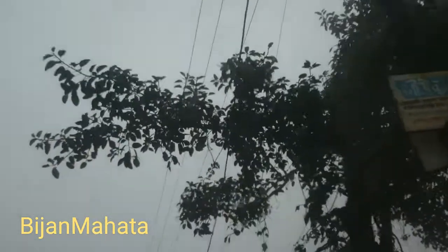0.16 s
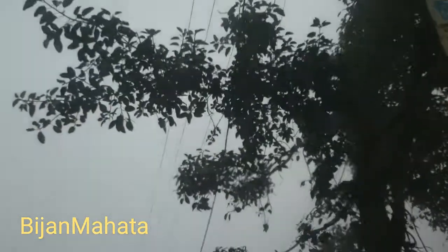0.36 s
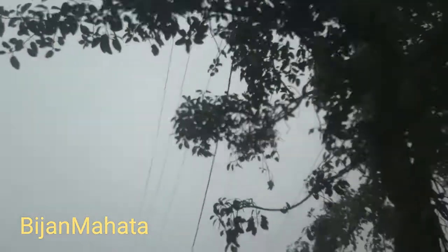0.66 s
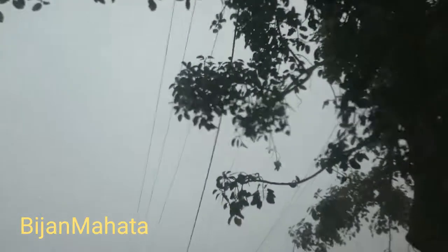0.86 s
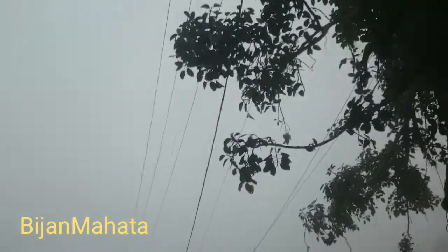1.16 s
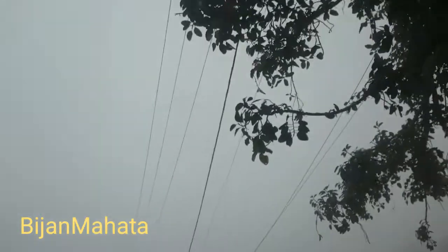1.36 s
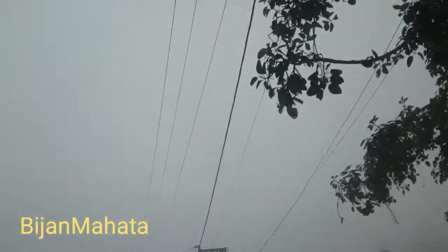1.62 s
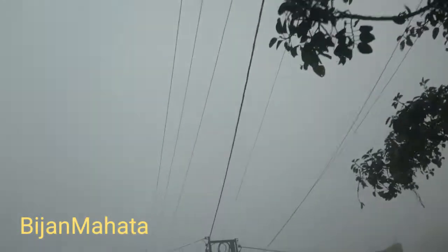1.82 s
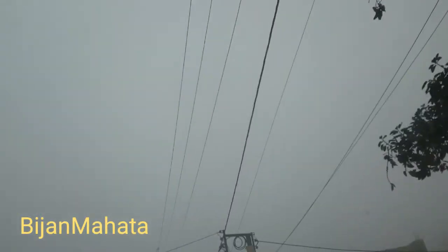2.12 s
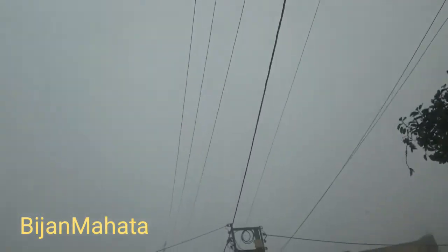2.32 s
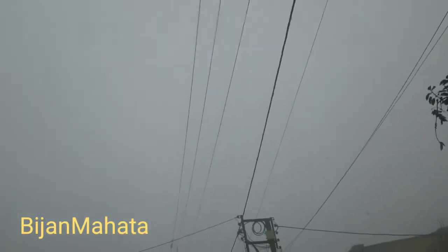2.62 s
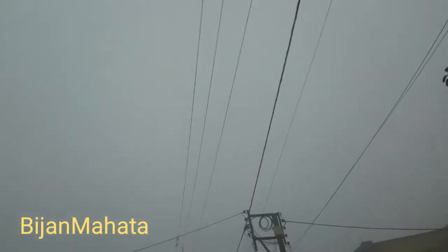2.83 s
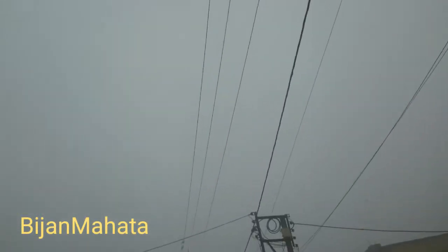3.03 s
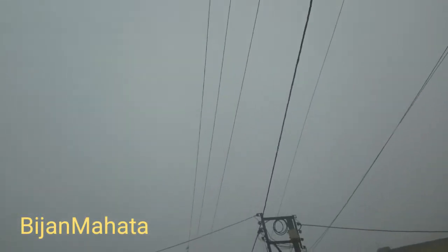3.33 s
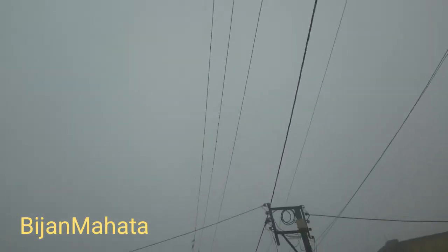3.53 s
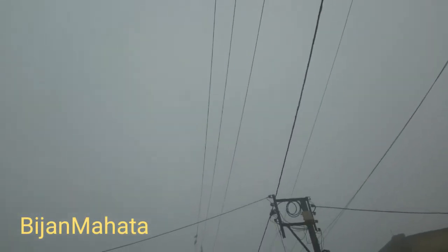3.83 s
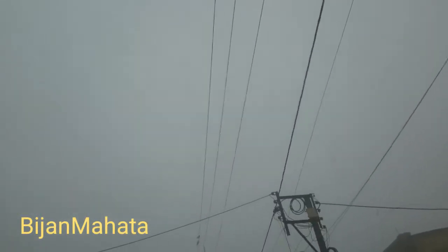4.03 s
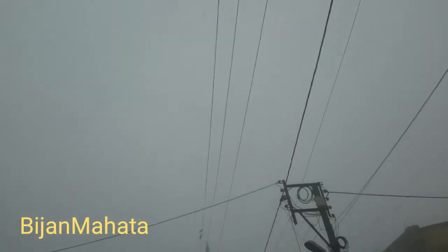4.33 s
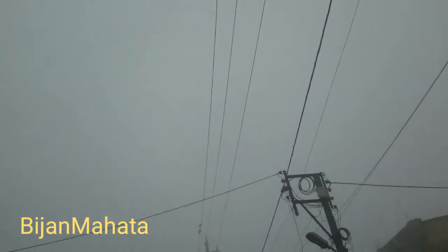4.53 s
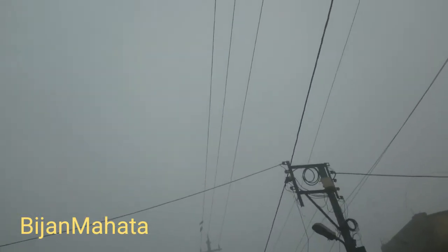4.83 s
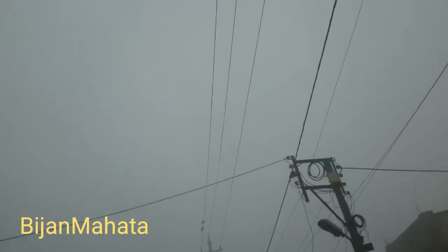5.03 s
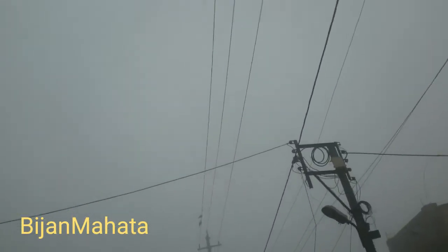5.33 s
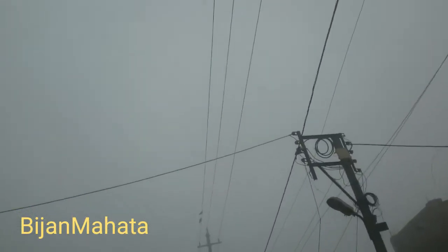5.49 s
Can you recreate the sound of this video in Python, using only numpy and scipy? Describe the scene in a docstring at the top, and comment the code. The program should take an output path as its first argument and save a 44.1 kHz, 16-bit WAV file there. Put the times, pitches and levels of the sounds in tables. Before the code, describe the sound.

Small car cabin, close and dry, recorded by a phone; bass-heavy rumble and engine drone throughout, with soft tyre roar and airy hiss. At 0-0.15 s a trim joint creaks in quick slips over a deep swell. From 0.27 s a relay ticks evenly, about every third of a second, alternating slightly in tone. The drone wavers, with a dry crackle around 0.5-1.3 s. From 0.3 s a loose fitting rasps about twenty times a second, faint at first, stronger from 1.3 to 3.4 s and again 3.5-3.9 s, with small bright stop clicks. A hiss swells at 1.45 s. The engine sinks and fades until 3.3 s; grit patters from 2.5 to about 4.7 s. A plastic clack at 3.15 s, a harder clack and suspension thump at 3.65 s. After 4.3 s it pulls on again; clustered clacks and a low thump at 5.03 s, the drone rising to the end at 5.66 s.

```python
"""The engine drone of a small car sinks as it slows on a rough road, then picks up as it pulls on again.
The drone is a stack of sine waves; the body rumble, tyre roar, air rush and hiss are coloured noise.
A loose fitting rasps about twenty times a second in noise bursts and clicks on its stop.
A relay ticks evenly; the trim clacks, crackles and creaks: short pushes set resonances ringing."""
import sys
import numpy as np
from scipy import signal
from scipy.fft import rfft, irfft, next_fast_len
from scipy.io import wavfile
from scipy.ndimage import uniform_filter1d

SR = 44100
rng = np.random.default_rng(int(sys.argv[2]) if len(sys.argv) > 2 else 0)


def digitize_waveform(pressure):
    """Quantize a signal to 16-bit integers and store it at the path in sys.argv[1].

    Rows of a 2-D input are taken as channels; values are limited to [-1, 1].
    """
    field = np.atleast_2d(pressure).T
    bounded = np.clip(field, -1, 1)
    quanta = np.round(bounded * 32767).astype(np.int16)
    wavfile.write(sys.argv[1], SR, quanta)


N = 249555
TIME = np.arange(N) / SR  # seconds

# Engine speed over time. Each row: time in seconds, firing rate in Hz.
ENGINE_SPEED = [(0.0, 54.59), (0.6, 52.45), (0.95, 52.5), (1.7, 44.38), (2.5, 34.86), (3.3, 25.66),
                (4.3, 27.6), (5.1, 32.34), (5.45, 39.47), (5.66, 40.48)]
# Colour of gritty scraping. Each row: frequency in Hz, relative level in dB per Hz.
SCRAPE_COLOUR = [(4000, -2.5), (6400, 5), (8000, 2.5), (10400, 2.5), (12000, -5.5), (13800, -7),
                 (15000, -17)]
# Colour of the loose fitting's body, also lent to crackles. Each row: frequency in Hz, relative level in dB per Hz.
FITTING_COLOUR = [(700, 1), (1400, 4), (2100, -3.5), (2700, 5.5), (3400, 2.5), (4200, 7), (5100, 5.5),
                  (6000, -10), (7500, -22.5), (14000, -43)]


def undb(db):
    """Turn decibels into gain."""
    return 10 ** (np.asarray(db) / 20)


def unit(x):
    """Scale to an rms of 1."""
    return x / np.sqrt(np.mean(x ** 2))


def controls(table):
    """Draw straight lines between the rows of a table: one curve for each column after the time."""
    s, *columns = np.transpose(table)
    return [np.interp(TIME, s, column) for column in columns]


def cycles(hz):
    """Count the cycles since the start."""
    return np.cumsum(hz) / SR


def walk(rate):
    """Drift smoothly and randomly with rms 1, taking about `rate` new values a second."""
    k = int(SR / rate)
    steps = np.repeat(rng.standard_normal(N // k + 1), k)
    return unit(uniform_filter1d(uniform_filter1d(steps, k), k)[:N])


def noise(spectrum, grain_db=0):
    """Make noise of a given colour with rms 1; grain makes its tiny impacts uneven in size."""
    hz, db = np.transpose(spectrum)
    size = next_fast_len(N)
    bins_hz = np.fft.rfftfreq(size, 1 / SR)
    gain = undb(np.interp(np.log(bins_hz + 1), np.log(hz), db, left=-90, right=-90))
    grain = undb(grain_db * np.minimum(rng.exponential(size=N), 2 * np.pi))
    impacts = rng.standard_normal(N) * grain
    return unit(irfft(rfft(impacts, size) * gain, size)[:N])


def patchy(x, depth_db):
    """Let small patches of time and pitch flicker in level, so no two strokes have the same colour."""
    _, _, bands = signal.stft(x, nperseg=512)
    flicker = rng.standard_normal(bands.shape)
    for axis in (0, 1, 0, 1):
        flicker = uniform_filter1d(flicker, size=4, axis=axis)
    gain = undb(depth_db * np.clip(unit(flicker), -2, 2))
    return unit(signal.istft(bands * gain)[1][:N])


def taps(events):
    """Give one sharp push for each contact (start in seconds, level in dB)."""
    out = np.zeros(N)
    for s, db in events:
        out[int(s * SR)] += undb(db)
    return out


def bursts(events, rise_s, t60):
    """Shape contacts (start in seconds, peak in dB) that swell briefly and fall by 60 dB in t60 seconds."""
    out, t = np.zeros(N), TIME[:SR // 4]
    shape = (1 - np.exp(-t / rise_s)) * undb(-60 * t / t60)
    for s, db in events:
        start = max(int(s * SR), 0)
        part = shape[:N - start]
        out[start:start + len(part)] += undb(db) * part / shape.max()
    return out


def chatter():
    """Push as a buzzing contact does: equal tiny pushes in random directions."""
    return np.sign(rng.standard_normal(N))


def ring(force, modes):
    """Pass a force through resonances that die away, wide ones faster; white noise keeps its power."""
    t = TIME[:SR // 10]
    response = 0
    for k, (hz, width, db) in enumerate(modes):
        decay = undb(db) * width * np.exp(-np.pi * width * t)
        response = response + (-1) ** k * decay * np.cos(2 * np.pi * hz * t)
    return signal.fftconvolve(force, response / np.linalg.norm(response))[:N]


def clack(events, modes, buzz_db):
    """One hard contact and a short buzz set the resonances ringing."""
    # the hard contact lands 1 ms into the buzz
    blow = undb(17.5) * taps([(s + 0.001, db) for s, db in events])
    buzz = undb(buzz_db) * bursts(events, rise_s=0.001, t60=0.048) * chatter()
    return ring(blow + buzz, modes)


def cabin(x, wet_db=-12):
    """Glass and trim return a brief patter of close reflections."""
    t = TIME[:SR // 20]
    echoes = rng.standard_normal(len(t)) * undb(-60 * t / 0.04) * (t > 0.001)  # gone in about 40 ms
    wet = signal.fftconvolve(x, echoes / np.linalg.norm(echoes))[:N]
    return (x + undb(wet_db) * wet) / np.hypot(1, undb(wet_db))


def heaves():
    """The cabin air booms in slow, deep swells as the body heaves."""
    # Each row: middle in seconds, half length in seconds, level in dB, pitch in Hz.
    swells = [(0.16, 0.065, -16.5, 73.9), (4.973, 0.048, -17, 68)]
    out = 0
    for s, length, db, hz in swells:
        swell = undb(db) * np.exp(-((TIME - s) / length) ** 2)
        out = out + swell * np.sin(2 * np.pi * hz * TIME + rng.uniform(0, 2 * np.pi))
    return out


def bumps():
    """A wheel drops into a rut and the suspension thumps at its resonances."""
    # Knocks on the suspension. Each row: start in seconds, level in dB.
    knocks = [(3.625, -24), (5.025, -36)]
    # Suspension resonances. Each row: frequency in Hz, width in Hz, relative level in dB.
    suspension = [(107, 14, 12), (180, 51.6, -4), (217, 19, -5)]
    return ring(bursts(knocks, rise_s=0.011, t60=0.15) * chatter(), suspension)


def tread(width_hz=55):
    """Tread blocks strike the road unevenly, so their hum is a narrow smeared band."""
    # Tread hum. Each row: time in seconds, pitch in Hz, level in dB.
    hum = [(1.8, 472.4, -80), (2.3, 374.5, -44), (2.9, 367.6, -47), (3.4, 338, -73), (5.6, 352.4, -49)]
    hz, db = controls(hum)
    smear = walk(2 * width_hz) + 1j * walk(2 * width_hz)
    return undb(db) * np.real(smear * np.exp(2j * np.pi * cycles(hz)))


def swishes():
    """Bright hisses swell and fade briefly, each around its own pitch."""
    # Swells of hiss. Each row: middle in seconds, half length in seconds, level in dB, centre in Hz.
    swells = [(1.458, 0.077, -44, 4800), (5.563, 0.1, -52, 4500)]
    # Colour of a swish. Each row: multiple of the centre, relative level in dB per Hz.
    colour = [(0.42, -17), (0.66, -11), (0.85, -5.5), (1, 1), (1.099, -2.5), (1.28, -16), (1.75, -23),
              (2.15, -19.5), (2.7, -35)]
    out = 0
    for s, length, db, centre_hz in swells:
        swell = undb(db) * np.exp(-((TIME - s) / length) ** 2)
        out = out + swell * noise([(k * centre_hz, k_db) for k, k_db in colour])
    return out


def grit():
    """Grit hits the wheel arches in uneven little clumps, with larger stones now and then."""
    # Strength of the grit. Each row: time in seconds, level in dB.
    strength = [(0, -67), (0.9, -64), (1.8, -62.5), (2.5, -55.5), (3.75, -56), (3.92, -68), (4.17, -54.5),
                (4.4, -83), (4.65, -62), (4.9, -74), (5.66, -76)]
    # Larger stones. Each row: start in seconds, level in dB.
    stones = [(2.578, -50), (2.672, -53), (3.545, -47), (3.692, -50), (3.795, -48), (3.974, -55),
              (4.112, -55), (4.175, -52), (4.58, -52), (4.642, -55)]
    # Wheel arch resonances. Each row: frequency in Hz, width in Hz, relative level in dB.
    arches = [(1080, 104, 3), (1304, 115, 4.5), (1613, 140, 0), (2486, 190, -2), (4900, 610, -7.5)]
    clumps_per_s, scatter_db = 42, 4.5
    db, = controls(strength)
    count = int(clumps_per_s * TIME[-1])
    late, size = rng.random((count, 2)).T
    starts = (np.arange(count) + late) / clumps_per_s
    # the factor sqrt(12) gives evenly spread random sizes the scatter set above
    clumps = bursts(zip(starts, scatter_db * np.sqrt(12) * size), rise_s=0.0014, t60=0.049)
    force = undb(db) * unit(clumps) + bursts(stones, rise_s=0.0023, t60=0.046)
    return ring(force * chatter(), arches)


def hiss():
    """Air rushes past the cabin, throbbing with the engine; fine grit hisses and crackles off the tyres."""
    # Air and tyres. Each row: time in seconds, rush level in dB, hiss level in dB.
    levels = [(0, -59.5, -62.5), (0.45, -62.5, -63.5), (1.35, -56, -58), (1.85, -59, -60),
              (2.25, -56.5, -57), (3.7, -55, -57), (3.92, -60.5, -59), (4.45, -60, -60), (4.98, -58.5, -58),
              (5.18, -55.5, -54), (5.36, -59, -60)]
    # Colour of the air rush. Each row: frequency in Hz, relative level in dB per Hz.
    rush_colour = [(600, -24), (900, 7), (980, 3), (1070, 1.5), (1150, 2.5), (1250, 4), (1350, 1.5),
                   (1470, 3), (2000, -3), (2400, -1.5), (2680, -4.5), (3100, -5.5), (4500, -41),
                   (8000, -42)]
    # Colour of the tyre hiss. Each row: frequency in Hz, relative level in dB per Hz.
    tyre_colour = [(2000, -13), (3200, -5.5), (3900, 0.5), (4400, 0.5), (5000, 6.5), (5500, 3.5),
                   (6400, -8), (8000, -17), (14000, -35)]
    # Colour of the fine spray. Each row: frequency in Hz, relative level in dB per Hz.
    spray_colour = [(4500, -1), (6500, -3.5), (8700, -5.5), (10400, -3), (12000, -6), (13500, -11.5),
                    (15000, -21)]
    rush_db, hiss_db = controls(levels)
    firing_hz, = controls(ENGINE_SPEED)
    flutter = walk(30.35)
    throb_db = 0.5 * np.cos(np.pi * cycles(firing_hz))  # one throb in two firings
    # spray grows faster than the hiss: 2.17 dB per dB, but never drops below -73.5 dB
    spray_db = np.maximum(-60.5 + 2.17 * (hiss_db + 56.5), -73.5)
    rush = undb(rush_db + throb_db + 1.4 * flutter) * noise(rush_colour, grain_db=3.5)
    tyres = undb(hiss_db + 1.1 * flutter) * patchy(noise(tyre_colour, grain_db=2.0), depth_db=1.6)
    crackle = undb(hiss_db - 22.0) * noise(FITTING_COLOUR, grain_db=6.0)
    spray = undb(spray_db + 0.33 * flutter) * noise(spray_colour, grain_db=3.0)
    return rush + tyres + crackle + spray


def relay():
    """The indicator relay closes and opens in turn, snapping and pinging; opening adds a bright click."""
    # Housing resonances. Each row: frequency in Hz, width in Hz, relative level in dB.
    housing_modes = [(1876, 96, 4.5), (2230, 120, -11), (3000, 170, -4.5), (4340, 590, -5.5),
                     (6070, 470, -5.5), (10000, 3300, -22.5)]
    first_tick_s, period_s = 0.2737, 0.34275
    ping_hz, close_ping_db, open_ping_db = 1776, -45, -58
    times = np.arange(first_tick_s, TIME[-1], period_s)
    ticks = bursts([(s, -47.5) for s in times], rise_s=0.0017, t60=0.045)
    housing = ring(ticks * chatter(), housing_modes)
    bright = noise(SCRAPE_COLOUR) + undb(5.0) * noise(FITTING_COLOUR)
    opening = bursts([(s, -57) for s in times[1::2]], rise_s=0.0042, t60=0.084) * bright
    ping_events = [(s, open_ping_db if k % 2 else close_ping_db) for k, s in enumerate(times)]
    pings = bursts(ping_events, rise_s=0.0015, t60=0.029) * np.sin(2 * np.pi * ping_hz * TIME)
    return housing + opening + pings


def trim_clacks():
    """A plastic panel clacks in its clips, each time with its own mix of knock, snap and crack."""
    # Clacks. Each row: start in seconds, then relative levels of knock, snap and crack in dB,
    # and the tilt of the knock in dB per octave (higher is brighter).
    clacks = [(3.1553, -28, -34.5, -41.5, 1), (3.648, -23, -29.5, -35.5, 2), (5.018, -38, -43, -50, 7),
              (5.0291, -24.5, -29.5, -36, -2), (5.084, -46, -38.5, -57, 2)]
    # Low panel resonances. Each row: frequency in Hz, width in Hz, relative level in dB.
    panel = [(254.8, 45, 0), (485, 110, 4.5), (818, 65, 8.5), (1088, 54, 10), (1220, 120, 3.5),
             (1480, 85, 9.5), (1830, 120, 4), (2100, 100, 1), (2610, 160, 3.5), (3060, 67, 1)]
    # High resonances of the clips. Each row: frequency in Hz, width in Hz, relative level in dB.
    clips = [(3950, 400, 8.5), (4200, 310, 6.5), (4750, 170, 11), (5480, 730, 6), (9700, 5000, -16)]
    # Colour of the crack. Each row: frequency in Hz, relative level in dB per Hz.
    crack_colour = [(3000, 6), (5500, 8), (6800, -10), (10000, 2.5), (13000, -2.5), (15000, -15)]
    knock = 0
    for s, db, _, _, tilt in clacks:
        tilted = [(hz, width, mode_db + tilt * np.log2(hz)) for hz, width, mode_db in panel]
        knock = knock + clack([(s, db)], tilted, buzz_db=-3.5)
    snap = clack([(s, db) for s, _, db, _, _ in clacks], clips, buzz_db=-1.0)
    crack = bursts([(s, db) for s, _, _, db, _ in clacks], rise_s=0.0011, t60=0.031) * noise(crack_colour)
    return undb(-2.0) * knock + undb(-0.5) * snap + crack


def trim_creak():
    """A joint sticks and slips in quick steps, and rings at each slip."""
    # Slips. Each row: start in seconds, level in dB.
    slips = [(0.024, -25), (0.0355, -23.5), (0.048, -25), (0.06, -26), (0.073, -33), (0.0965, -32),
             (0.12, -33), (0.144, -35)]
    # Joint resonances. Each row: frequency in Hz, width in Hz, relative level in dB.
    joint = [(2600, 190, -6), (3150, 110, -2), (3390, 46, -1), (3850, 270, -8.5)]
    return cabin(ring(taps(slips), joint), wet_db=-8)


def trim_crackle():
    """A dry crackle in the trim: clicks at random moments set broad resonances ringing."""
    # How dense the clicks are. Each row: time in seconds, clicks per second.
    density = [(0.45, 0), (0.53, 50), (0.7, 25), (0.88, 100), (1.0, 25), (1.3, 0)]
    # Crackle resonances. Each row: frequency in Hz, width in Hz, relative level in dB.
    modes = [(1610, 260, 4.5), (2820, 1700, -4), (5000, 1600, -6)]
    rate, = controls(density)
    clicks = (rng.random(N) < rate / SR) * chatter()
    return undb(-33) * ring(clicks, modes)


def stops():
    """The loose fitting swings wide and clicks on its stop, a slightly different colour each time."""
    # Hits on the stop. Each row: start in seconds, relative peak in dB.
    hits = [(1.5988, -44), (1.8876, -47.5), (2.0318, -44), (2.1791, -41.5), (3.253, -45), (3.6745, -41),
            (3.7249, -43), (3.7798, -46.5), (4.0874, -47.5), (4.152, -42.5), (4.2098, -44.5),
            (4.622, -50.5), (4.6827, -44.5), (5.1916, -49)]
    # Stop resonances. Each row: frequency in Hz, width in Hz, relative level in dB.
    modes = [(4400, 530, 7.5), (5460, 810, 6.5), (6140, 460, 5), (8100, 970, -5), (10070, 570, 1),
             (11800, 1400, -3.5)]
    force = bursts(hits, rise_s=0.0016, t60=0.12) * patchy(chatter(), depth_db=-1.0)
    return undb(-5.0) * ring(force, modes)


def rattle():
    """The loose fitting rocks evenly, in bouts; each stroke is a short gritty scrape over a soft rub."""
    # Rocking speed. Each row: time in seconds, strokes per second.
    stroke_rate = [(0, 21.1), (0.6, 21.1), (0.68, 25.3), (0.76, 21.3), (1.3, 20.85), (2.8, 20.61),
                   (3.6, 18.85), (5.66, 18.2)]
    # Bouts. Each row: start in seconds, end in seconds, scrape level in dB at the start,
    # scrape level in dB at the end, body level in dB, rub level in dB (all before random scatter).
    bouts = [(0.31, 1.0, -75, -66, -66, -54), (1.004, 1.265, -64, -70, -51.5, -50.5),
             (1.28, 1.998, -57.5, -55, -54.5, -55.5), (2.012, 3.38, -54.5, -52.5, -60.5, -53.5),
             (3.49, 3.865, -53, -51.5, -63, -58)]
    # Colour of the rub. Each row: frequency in Hz, relative level in dB per Hz.
    rub_colour = [(2500, -10), (3700, -3.5), (4400, -4), (5100, 1.5), (5600, -5.5), (6500, -17.5),
                  (9000, -41)]
    scatter_db, lead_s = 1, 0.0058
    rate, = controls(stroke_rate)
    # a stroke starts a little before each whole cycle
    beats = TIME[1:][np.diff(np.floor(cycles(rate))) > 0] - lead_s
    strokes = []
    for start, end, first_db, last_db, body_level, rub_level in bouts:
        for t in beats:
            if start <= t <= end:
                scrape_level = np.interp(t, (start, end), (first_db, last_db))
                strokes.append((t, scrape_level, body_level, rub_level))
    s, scrape_db, body_db, rub_db = np.transpose(strokes)
    scrape_luck, body_luck = scatter_db * rng.standard_normal((len(s), 2)).T

    scrape_noise = patchy(noise(SCRAPE_COLOUR, grain_db=-2.5), depth_db=5.5)
    body_noise = patchy(noise(FITTING_COLOUR, grain_db=-2.0), depth_db=6.0)
    rub_noise = patchy(noise(rub_colour), depth_db=3.0)
    scrape = bursts(zip(s, scrape_db + scrape_luck), rise_s=0.0069, t60=0.086) * scrape_noise
    body = bursts(zip(s, body_db + body_luck), rise_s=0.012, t60=0.11) * body_noise
    rub = bursts(zip(s, rub_db + body_luck), rise_s=0.01, t60=0.06) * rub_noise
    return scrape + body + rub


def road(rumble_share=0.29, thud_share=1.82):
    """Rough patches shake the body and thud in the wheels; the tread roars above them."""
    # Road. Each row: time in seconds, body rumble in dB, tyre roar in dB (both lifted a little below).
    levels = [(0, -24.5, -46), (1.8, -29.5, -48), (2.35, -24.5, -46), (3.5, -32, -46), (4.2, -27, -48.5),
              (4.53, -32.5, -49.5), (4.75, -26, -48.5), (4.95, -24, -48.5), (5.66, -26.5, -49)]
    # Rough patches. Each row: middle in seconds, half length in seconds, boost in dB before sharing out.
    patches = [(0.112, 0.1, 5), (1.297, 0.3, 2.5), (2.11, 0.23, 3), (2.97, 0.091, 3.5), (3.694, 0.063, 4.5)]
    # Colour of the body rumble. Each row: frequency in Hz, relative level in dB per Hz.
    rumble_colour = [(20, -49), (27, -20), (35, 1), (45, -11), (54, 7), (62, 0.5), (75, 0), (95, -6.5),
                     (125, -41), (200, -57)]
    # Colour of the wheel thud. Each row: frequency in Hz, relative level in dB per Hz.
    thud_colour = [(60, -42), (95, -9.5), (120, 3), (148, -5.5), (165, -11), (190, -9.5), (220, -20.5),
                   (400, -43)]
    # Colour of the tyre roar. Each row: frequency in Hz, relative level in dB per Hz.
    roar_colour = [(130, 7), (210, -2), (260, 5), (300, 0), (350, 5.5), (410, -2.5), (500, -5), (600, -7.5),
                   (700, -8), (820, -13), (1000, -35), (2000, -54)]
    rumble_db, roar_db = controls(levels)
    boost_db = sum(db * np.exp(-((TIME - s) / length) ** 2) for s, length, db in patches)
    sway = noise(rumble_colour)
    # level out the strongest swells so that the rumble stays steady
    sway_power = uniform_filter1d(sway ** 2, SR // 10)
    sway = unit(sway / (sway_power + 0.065) ** 0.2)
    rumble = undb(rumble_db + 2.5 + rumble_share * boost_db) * sway
    thud = undb(-35.5 + thud_share * boost_db) * noise(thud_colour)
    roar = undb(roar_db + 3.5 + 0.93 * walk(20)) * noise(roar_colour)
    return rumble + thud + roar


def whirr():
    """The running gear shakes the engine bay, pulsing with the firings, and falls quiet as the revs drop."""
    # Engine bay resonances. Each row: frequency in Hz, width in Hz, relative level in dB.
    bay = [(631, 37, 0), (692.5, 27, 4), (787, 27, -4.5), (1575, 94, -10), (1986, 63, -14)]
    full_hz, fade_db_per_hz = 47.8, 1.1  # the whirr fades below this firing rate
    hz, = controls(ENGINE_SPEED)
    db = -54.5 - fade_db_per_hz * np.maximum(full_hz - hz, 0)
    pulse = undb(4.4 * np.cos(2 * np.pi * cycles(hz)))
    return undb(db) * unit(ring(pulse * chatter(), bay))


def engine():
    """Multiples of the firing rate waver, grow quieter as the firing rate falls low, and boom where they meet a
    cabin resonance."""
    # Engine orders. Each row: multiple of the firing rate, relative level in dB.
    orders = [(1, 1), (2, -15.5), (3, -28.5), (4, -36), (5, -41.5)]
    # Changes in the drone's level. Each row: time in seconds, change in dB.
    level_changes = [(0, -8), (0.24, -5), (0.33, 1), (0.5, -5), (0.58, -14), (0.65, 1.5), (0.92, -1.5),
                     (1.01, -9), (1.1, -1), (1.6, 0)]
    # Cabin air resonances. Each row: multiple of the firing rate, frequency in Hz, width in Hz, rms level in dB.
    resonances = [(2, 52.7, 1.63, -25), (3, 148, 2.95, -30)]
    full_hz, fade_db_per_hz = 40.25, 1.5  # the drone fades below this firing rate
    hz, = controls(ENGINE_SPEED)
    change_db, = controls(level_changes)
    db = -21 + change_db - fade_db_per_hz * np.maximum(full_hz - hz, 0)
    phase = 2 * np.pi * cycles(hz * (1 + 0.0053 * walk(13.07)))
    drone, boom = 0, 0
    for k, order_db in orders:
        wavering = undb(order_db + 0.5 * walk(9.3))
        drone = drone + wavering * np.sin(round(k) * phase + rng.uniform(0, 2 * np.pi))
    for k, centre_hz, width_hz, boom_db in resonances:
        closeness = 1 / (1 + ((round(k) * hz - centre_hz) / width_hz) ** 2)
        boom = boom + undb(boom_db) * closeness * np.sin(round(k) * phase)
    return np.sqrt(2) * (undb(db) * drone + boom)  # sqrt(2) gives a sine an rms of 1


def scene():
    """Add up everything as heard from a seat in the cabin; the bright sources also get its reflections."""
    trim = trim_clacks() + trim_creak() + trim_crackle()
    low = heaves() + bumps() + tread() + road()
    reflected = cabin(swishes() + grit() + hiss() + stops() + rattle())
    return (low + relay() + trim + reflected + whirr() + engine())[None]


def record(dry):
    """Cut the top steeply above 15.5 kHz, as the phone that picks up the sound does."""
    return signal.sosfilt(signal.ellip(8, 0.2, 70, 15500, fs=SR, output="sos"), dry)


dry = scene()
out = record(dry)
digitize_waveform(out)
```